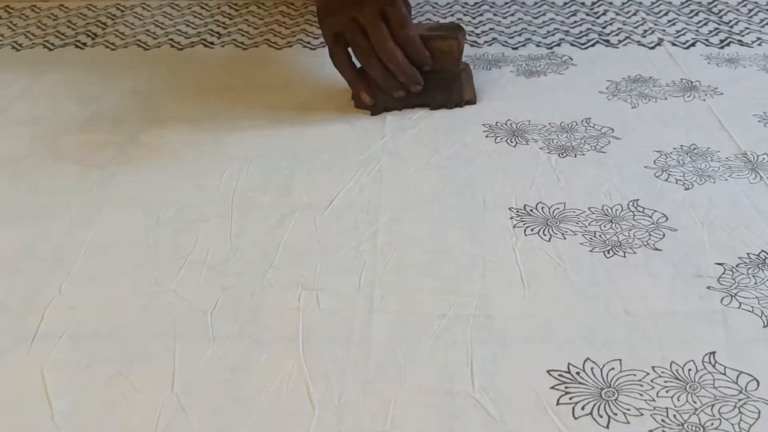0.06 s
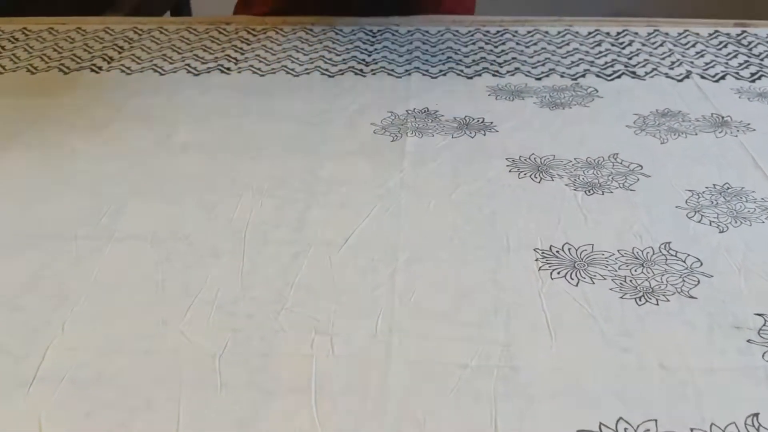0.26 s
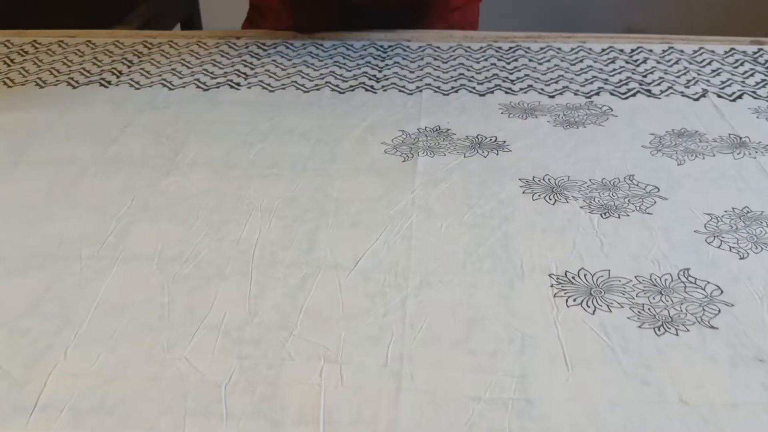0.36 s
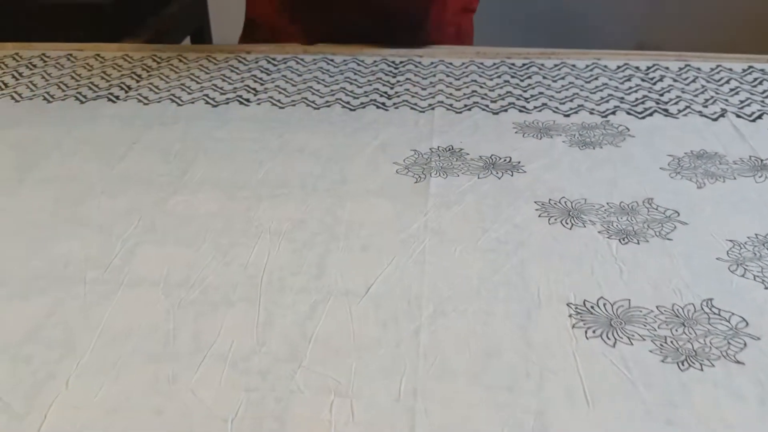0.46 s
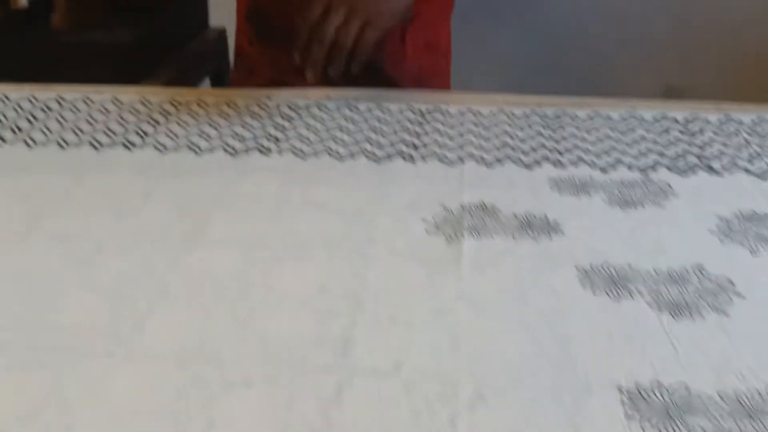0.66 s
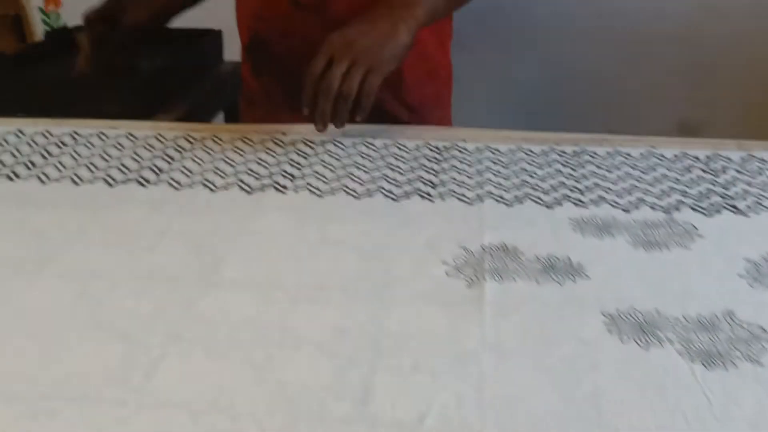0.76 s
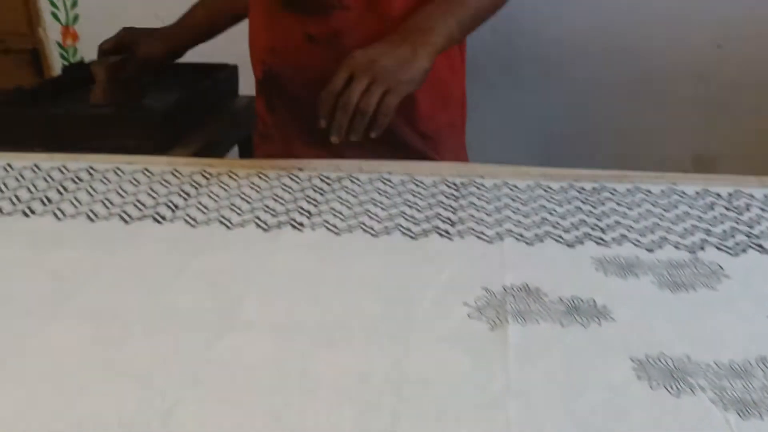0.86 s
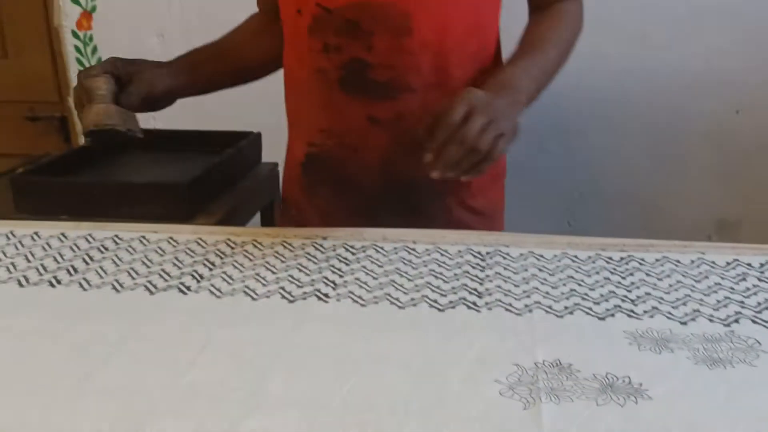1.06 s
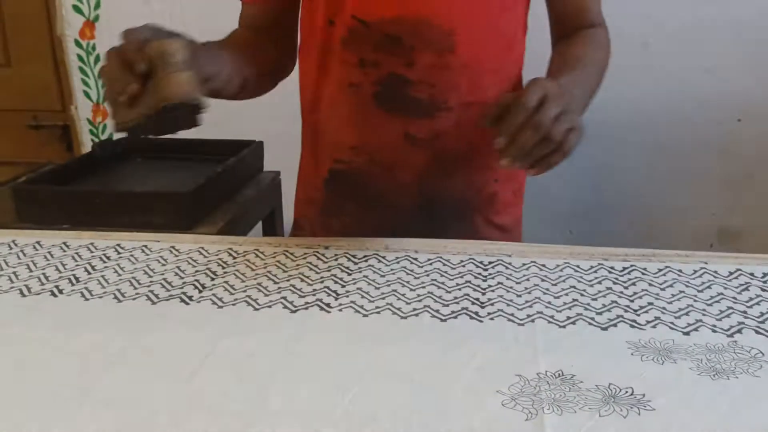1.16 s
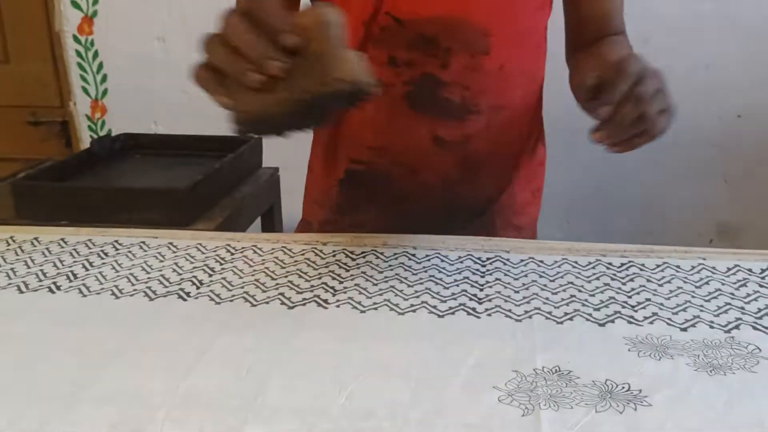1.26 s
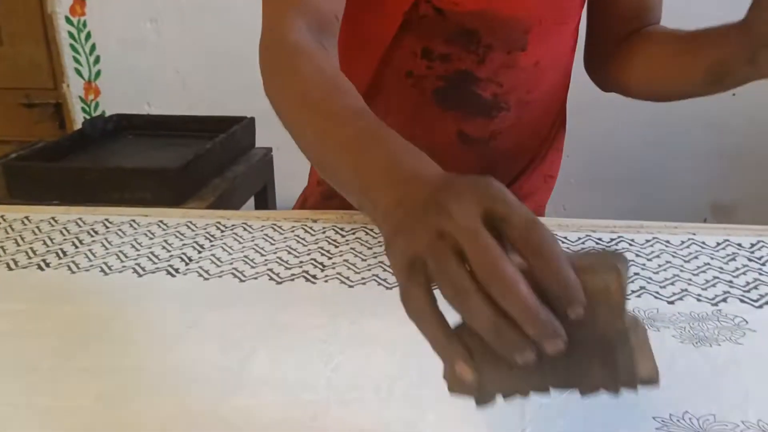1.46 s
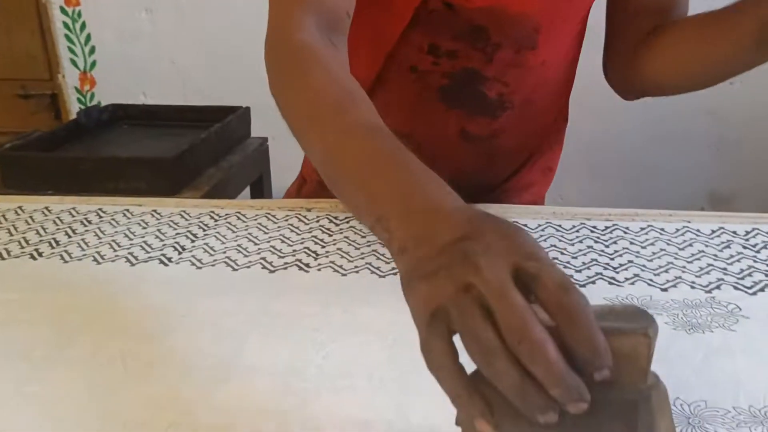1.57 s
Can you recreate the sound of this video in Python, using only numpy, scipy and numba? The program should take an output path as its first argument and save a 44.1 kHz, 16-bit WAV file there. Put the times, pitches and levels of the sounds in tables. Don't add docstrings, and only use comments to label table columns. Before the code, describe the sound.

A wooden printing block is thumped onto a padded table: the tail of an earlier blow at 0 s, then a loud, deep boom with a sharp crack at about 0.22 s, fading over half a second. Bare feet scuff grittily on the right from 0.28 to 0.65 s and again after 0.95 s. Small wooden ticks at 0.92 s precede a hard tray clack and rasp around 1.06-1.2 s. Quiet small room.

```python
import sys
import numpy as np
from scipy import signal
from scipy.fft import rfft, irfft
from scipy.io import wavfile
from scipy.ndimage import uniform_filter1d
from numba import njit

SR = 44100
rng = np.random.default_rng(int(sys.argv[2]) if len(sys.argv) > 2 else 0)


def store_pcm(level_fs):
    pcm = np.round(np.clip(level_fs, -1, 1) * 32767).astype(np.int16)
    wavfile.write(sys.argv[1], SR, np.atleast_2d(pcm).T)


def rack_gain(trim_db):
    fader = np.asarray(trim_db, float)
    return 10 ** (fader / 20)


N = 70560
LEAD = 4410
NOW_S = np.arange(N) / SR
OPPOSITE = np.array([[1], [-1]])
KNOCK_PAN_DB, FEET_PAN_DB, FIST_PAN_DB = -1, -12.5, 1


def curve(table, col):
    a = np.array(table)
    return np.interp(NOW_S, a[:, 0], a[:, col])


def unit(x):
    return x / np.sqrt(np.mean(x ** 2))


def noise():
    return rng.standard_normal((2, N))


def band(x, hz, octaves):
    f = np.arange(x.shape[-1] // 2 + 1) * SR / x.shape[-1] + 1
    bell = np.exp(-(np.log2(f / hz) / octaves) ** 2)
    return irfft(rfft(x) * bell, x.shape[-1])


def tone_db(table, hz):
    a = np.array(table)
    return np.interp(np.log(hz), np.log(a[:, 0]), a[:, 1]) + 10 * np.log10(hz)


def walk(rate_hz):
    k = int(SR / rate_hz)
    steps = np.repeat(rng.standard_normal(N // k + 1), k)
    return 1.3 * uniform_filter1d(uniform_filter1d(steps, k), k)[:N]


def ring(at_s, push_s, hz, db, t60_s):
    x = np.zeros(N + LEAD)
    k = max(int(push_s * SR), 1)
    i = int(at_s * SR) + LEAD
    x[i:i + k] = np.hanning(k + 2)[1:-1] * 2 / (k + 1)
    pole = np.exp(2j * np.pi * hz / SR - np.log(1000) / (max(t60_s, .002) * SR))
    end = i + k + int(1.3 * t60_s * SR)
    x[i:end] = rack_gain(db) * signal.lfilter([1], [1, -pole], x[i:end]).imag
    return x[LEAD:]


def swells(rows):
    out = 0
    for start_s, hz, db, swell_ms in rows:
        t = np.clip(NOW_S - start_s, 0, None)
        age = t / (swell_ms / 1000)
        out = out + rack_gain(db) * age * np.exp(1 - age) * np.sin(2 * np.pi * hz * t)
    return out


def pan(x, db):
    return x * rack_gain(np.array([[db / 2], [-db / 2]]))


# frequency in Hz, level in dB per Hz.
AIR_SPECTRUM = [(30, -11), (110, -4), (200, -10.5), (300, -20), (520, -24), (1500, -31), (6500, -39.5),
                (8200, -52), (16000, -45)]


def air():
    out = 0
    for hz in 35 * 2 ** np.arange(0, 9, .5):
        mid, side = unit(band(noise(), hz, 0.29))
        wide = min(hz / 900, 1)
        level_db = tone_db(AIR_SPECTRUM, hz) + 2.2 * walk(9.13)
        out = out + rack_gain(level_db) * pan(mid + wide * side * OPPOSITE, -8 * wide)
    return unit(out) * rack_gain(-58.5)


@njit
def walls(x, lags, gain, damp):
    line, soft, out = np.zeros((8, 4096)), np.zeros(8), np.zeros((2, len(x)))
    for i in range(len(x)):
        total = 0.
        for k in range(8):
            soft[k] += (1 - damp) * (gain[k] * line[k, (i - lags[k]) & 4095] - soft[k])
            total += soft[k]
            out[k % 2, i] += soft[k]
        for k in range(8):
            line[k, i & 4095] = x[i] + soft[k] - total / 4
    return out


def room(knocks, steps):
    t60_s, damp, knock_db, feet_db = 0.38, 0.272, -9, -24
    lags = rng.integers(500, 2200, 8)
    send = rack_gain(knock_db) * knocks.mean(axis=0) + rack_gain(feet_db) * steps.mean(axis=0) + 1e-18
    return walls(send, lags, rack_gain(-60 * lags / SR / t60_s), damp)


# time in s, level in dB, brightness in dB per octave.
FEET = [(0, -57.5, -7.5), (.14, -86.5, -8), (.232, -55, -4), (.285, -44, -4), (.36, -46, -4),
        (.39, -50.5, -3), (.42, -50, 2), (.475, -41, -1), (.6, -44.5, -1.2), (.65, -51, -9),
        (.79, -70.5, -13.5), (.88, -65, 7.5), (.945, -59, -8), (.953, -55, 9.5), (1.05, -48.5, 2),
        (1.075, -52, -7), (1.11, -51, -7), (1.2, -51.5, -2.5), (1.345, -49.5, -4.5), (1.4, -57, -7.5),
        (1.46, -71.5, -5.5)]
# frequency in Hz, level in dB per Hz.
SOLE = [(590, -62), (1000, -34), (1650, -17), (1790, -12), (2130, -14.5), (3930, -3.5), (6250, -4),
        (8450, -21), (13500, -12), (16000, -28)]
# frequency in Hz, width in Hz, boost in dB.
SOLE_PEAKS = [(3860, 60, 5.5), (4056, 69, 8), (4355, 55, 7.5), (4680, 110, 3.5), (6030, 340, 3.5),
              (6610, 570, 4.5), (2385, 460, 4)]


def feet():
    grit_per_s, grit_db, bright_top_hz = 9000, 1.71, 7300
    out, bright = 0, curve(FEET, 2)
    far_db = -4 * (np.arange(N) > 0.66 * SR)
    for k, hz in enumerate(1000 * 2 ** np.arange(0, 4.1, .25)):
        if k % 3 == 0:
            luck = rng.random((4, N))
            hits = luck[2:] < grit_per_s / SR
            grit = np.sign(luck[:2] - .5) * hits * rack_gain(grit_db * rng.exponential(size=(2, N)))
        db = tone_db(SOLE, hz) + bright * np.log2(min(hz, bright_top_hz) / 4000)
        db = db + 2.5 * walk(25.38) + far_db * (hz > bright_top_hz)
        out = out + rack_gain(db) * band(grit, hz, 0.33) / np.sqrt(hz)
    for hz, width_hz, db in SOLE_PEAKS:
        out = out + (rack_gain(db) - 1) * band(out, hz, width_hz / hz)
    return pan(unit(out) * rack_gain(curve(FEET, 1) + 1.5 + 0.82 * walk(60.2)), FEET_PAN_DB)


# start in s, level in dB, contact in ms, share of the ring time,
# lowest mode well struck in Hz.
KNOCKS = [(.162, -44.5, 1.65, 0.85, 403), (.3225, -40, 1.2, 0.28, 600), (.642, -49, 0.63, 1.6, 600),
          (.665, -49.5, 0.38, 1.2, 600), (0.9163, -42.5, 0.35, 0.75, 860), (0.921, -44, 0.17, 0.68, 910),
          (0.9258, -54.5, 0.53, 1.2, 692), (.95, -60, 0.37, 0.53, 1500), (1.0609, -28, 0.14, 0.41, 600),
          (1.0642, -28, 1.6, 0.59, 189), (1.079, -39, 0.51, 0.56, 900), (1.1189, -41, 0.43, 0.49, 900),
          (1.121, -43, 0.16, 0.32, 900), (1.13, -43, 0.13, 0.74, 1230), (1.135, -41, .5, 0.33, 300)]
# frequency in Hz, level in dB, t60 in s.
TRAY = [(225, -7, 0.079), (335, -1.5, 0.053), (593, -27, 0.16), (600, -11.5, 0.0804), (790, 5, 0.017),
        (1050, -14, 0.14), (1234, 5, 0.03), (1790, -2.5, 0.057), (2430, -16, 0.072), (3450, -10, 0.045)]
# start in s, end in s, level in dB, centre in Hz, width in octaves.
DRAG = [
    (0.165, 0.258, -57.5, 1090, 1.17),
    (0.205, 0.25, -48, 7000, 2.2),
    (0.936, 1.011, -56, 930, 1.5),
    (1.033, 1.08, -46.5, 1260, 1.2),
    (1.045, 1.175, -43.5, 900, 1.22),
    (1.109, 1.234, -46, 1950, 0.88),
]


def tray():
    mix_db, low_cut_db_per_octave, left_early = 1.5, 43, 11
    out, mix = 0, rng.standard_normal((len(KNOCKS), len(TRAY)))
    for row, (start_s, db, ms, share, low_hz) in zip(mix, KNOCKS):
        hit = 0
        for luck, (hz, mode_db, t60_s) in zip(row, TRAY):
            cut_db = low_cut_db_per_octave * max(np.log2(low_hz / hz), 0)
            hit = hit + ring(start_s, ms / 1000, hz, db + mode_db + mix_db * luck - cut_db, t60_s * share)
        out = out + signal.sosfilt(signal.butter(3, 0.54 * low_hz, "high", fs=SR, output="sos"), hit)
    out = pan(np.array([np.roll(out, -left_early), out]), KNOCK_PAN_DB)
    for start_s, end_s, db, hz, octaves in DRAG:
        rasp = unit(band(noise() * rack_gain(2.1 * walk(150)), hz, octaves))
        stroke = np.clip((NOW_S - start_s) / (end_s - start_s), 0, 1)
        out = out + rasp * rack_gain(db) * np.sin(np.pi * stroke ** 0.62)
    return out


# start in s, frequency in Hz, level in dB, swell in ms.
CRACK = [(.2258, 6900, -17, .28), (.2259, 11000, -27, .25), (.2268, 4200, -33, .5), (.2253, 1300, -33, .8),
         (.2272, 6000, -39, .4), (.2236, 620, -28, 1.8), (.2295, 720, -36, 4), (.2262, 13800, -30, .2),
         (.3228, 720, -30, 1.6), (.3232, 900, -36, 2), (.935, 545, -52, 14), (.9179, 1050, -45, 5),
         (.9193, 712, -47, 5), (.917, 2300, -52, 2), (.9165, 1270, -47, 3), (.9259, 1200, -42, 1.3),
         (.9166, 1900, -49, 1.2), (.924, 1840, -55, 6), (.945, 1950, -57, 5), (.98, 1270, -56, 6),
         (.935, 780, -58, 8), (.95, 1340, -58, 10), (1.0604, 3650, -38, .5), (1.062, 575, -39, 6),
         (1.0638, 760, -30, 1.5), (1.0603, 2100, -33, .35), (1.0604, 2900, -39, .4), (1.076, 1120, -39, 6),
         (1.073, 545, -41, 8), (1.117, 1100, -40, 2), (1.118, 1800, -44, 1.5), (1.1195, 5000, -47, .8),
         (1.119, 2500, -43, 2), (1.129, 2400, -42, 1.5)]
# start in s, level in dB, frequency in Hz.
SNAPS = [
    (.9528, -44, 6500),
    (0.9585, -39.5, 6180),
    (.9887, -42, 6700),
    (1.021, -43, 5000),
    (1.037, -44, 2700),
    (1.047, -46, 3520),
    (1.327, -44.5, 3900),
]


def crack():
    snaps = swells([(start_s, hz, db - 1, 0.62) for start_s, db, hz in SNAPS])
    fist = swells([c for c in CRACK if c[0] < .5])
    block = swells([c for c in CRACK if c[0] >= .5])
    return pan(fist, FIST_PAN_DB) + pan(block, KNOCK_PAN_DB) + pan(snaps, FEET_PAN_DB)


# start in s, level in dB, push in s, share of the ring time.
BLOWS = [(-.03, -17.5, 0.0088, 0.78), (-.006, -11.5, 0.0051, 0.2), (.17, -36.5, 0.0063, 0.48),
         (.203, -20.5, 0.0073, 3.2), (.2125, 0.5, 0.014, 0.54), (.222, -0.5, 0.006, 0.31),
         (.2305, -1.5, 0.0044, 0.34), (.24, -6.5, 0.0046, 0.29), (.262, -4.5, 0.0064, 0.99),
         (.291, -9, 0.0032, 0.98), (.43, -16.5, 0.005, 1.19), (.76, -36, 0.0057, 0.28),
         (1.093, -51, 0.0054, 0.83), (1.13, -42, .016, 0.9), (1.359, -56, 0.014, 0.23),
         (1.45, -48.5, 0.0099, 0.54)]
# frequency in Hz, level in dB, t60 in s.
TABLE = [(48.9, -1.5, 0.27), (65.2, -20, 1.65), (95.65, -3, 0.84), (104.05, -7, 1.22), (111, 4, 0.22),
         (133.65, 5.5, 0.38), (162.8, -4.5, 1.1), (189.6, -5.5, 1.11), (215, -8, 1.05), (286.5, -12, 0.61),
         (300, -14, 0.47), (353.6, -8, .35), (398.7, -9, .33), (475.4, 1, 0.29)]
# frequency in Hz, level in dB, t60 in s.
BOOM = [(47, -33, .7), (110, -27, 1.1), (165, -26, 1.1), (270, -23, .36), (600, -38, .36), (1100, -46, .4),
        (2000, -52, .4)]
# start in s, level in dB, share of the decay time, brightness in dB per octave.
BOOM_STARTS = [
    (-.03, -8, 0.68, 2.4),
    (0.223, 7.5, 1.404, -0.26),
]
# start in s, frequency in Hz, level in dB, swell
# in ms.
LOW_SWELLS = [(.0, 51.8, -29, 17), (.2372, 195, -16.5, 4.7), (.236, 334, -23.5, 3.6), (.2642, 225, -19.5, 7),
              (.285, 126, -14.5, 7.5), (.43, 192.6, -25, 14), (.468, 159.7, -24.5, 16.7), (.5, 129.2, -31, 20),
              (.545, 150.5, -31.5, 15.7), (.44, 108, -27, 19.5), (.53, 99, -27, 14), (.58, 104.5, -31, 27),
              (.585, 193, -34.5, 18.4), (.76, 161.6, -38.5, 13.7), (.79, 99.7, -43.5, 20),
              (1.095, 207, -43, 7.3), (1.129, 153, -44, 4.8), (1.17, 180.5, -51, 11.4), (1.36, 105, -53, 25),
              (1.45, 137.6, -55.5, 20)]


def board(blows, hz, db, t60_s):
    return sum(ring(start_s, push_s, hz, db + hit_db - 8, t60_s * share)
               for start_s, hit_db, push_s, share in blows)


def scatter(hz, db, t60_s):
    shape, rise_s = 0, 0.0041
    for start_s, start_db, share, tilt_db in BOOM_STARTS:
        t = np.clip(NOW_S - start_s, 0, None)
        top_db = db + start_db + tilt_db * np.log2(hz / 200)
        shape = shape + (1 - np.exp(-t / rise_s)) * rack_gain(top_db - 60 * t / (t60_s * share))
    return shape


def table():
    side_db, sag_db_per_s2, main_s, trim_db, left_early = -17.5, 29.5, 0.24, -3.2, 6
    out = 0
    choke = rack_gain(-sag_db_per_s2 * np.clip(NOW_S - main_s, 0, None) ** 2 + trim_db)
    fist = [b for b in BLOWS if b[0] < .5]
    footfalls = [b for b in BLOWS if b[0] >= .5]
    for k, (hz, db, t60_s) in enumerate(TABLE):
        both = choke * board(fist, hz, db, t60_s) + board(footfalls, hz, db, t60_s)
        out = out + both * (1 + (-1) ** k * rack_gain(side_db) * hz / 120 * OPPOSITE)
    for hz, db, t60_s in BOOM:
        mid, side = unit(band(noise(), hz, .35 if hz < 250 else .5))
        out = out + choke * scatter(hz, db, t60_s) * (mid + min(hz / 1700, 1) * side * OPPOSITE)
    out = out + swells(LOW_SWELLS)
    left = np.append(out[0, left_early:], np.zeros(left_early))
    return np.array([left, out[1]]) + crack()


def scene():
    knocks, steps = tray(), feet()
    return air() + room(knocks, steps) + steps + knocks + table()


def roll_off(x):
    return signal.sosfilt(signal.butter(12, 15985, fs=SR, output="sos"), x)


def record(dry):
    dry = signal.sosfilt(signal.butter(3, 41, "high", fs=SR, output="sos"), dry)
    dry = signal.sosfilt(signal.ellip(8, .2, 60, 15950, fs=SR, output="sos"), dry)
    return roll_off(dry)


dry = scene()
out = record(dry)
store_pcm(out)
```